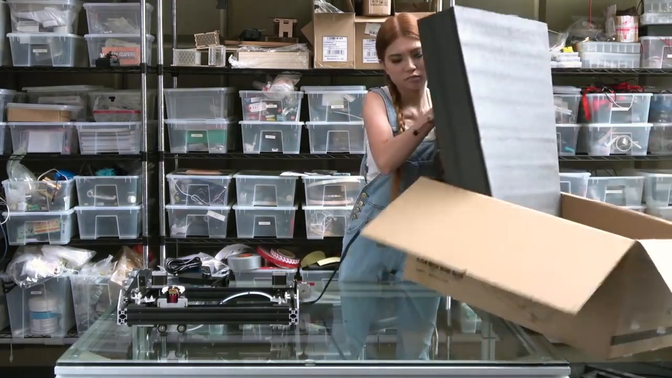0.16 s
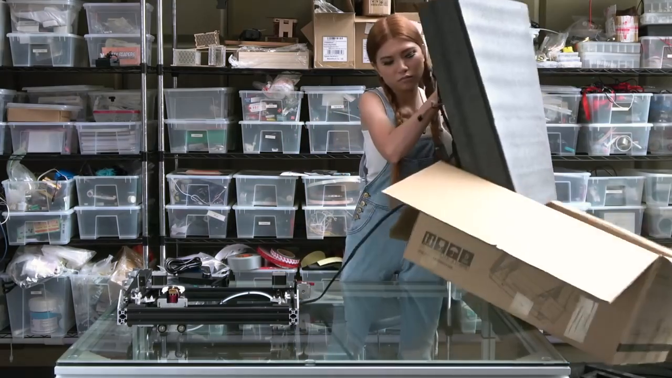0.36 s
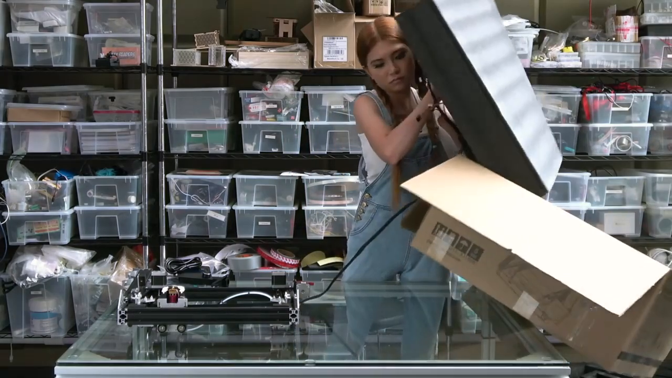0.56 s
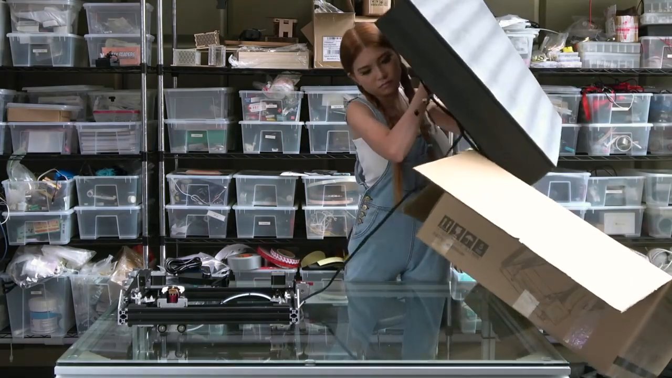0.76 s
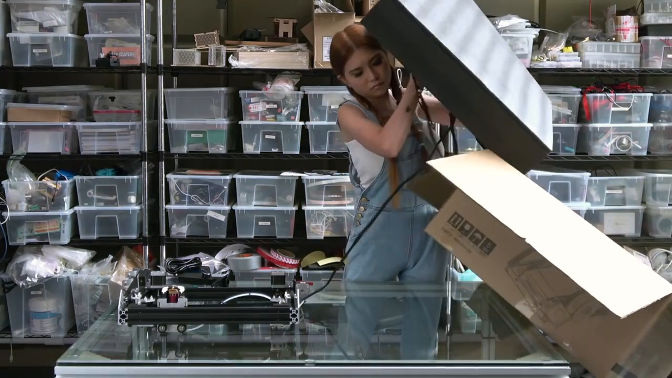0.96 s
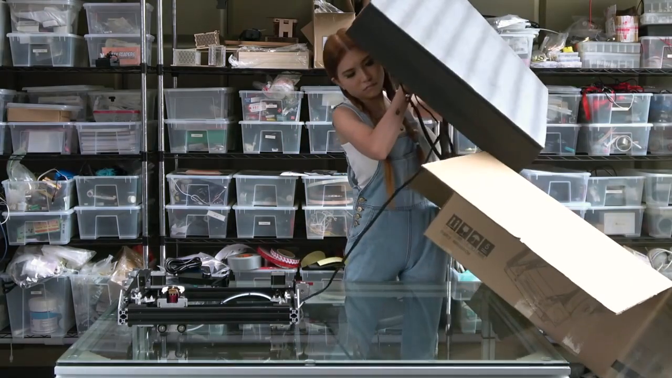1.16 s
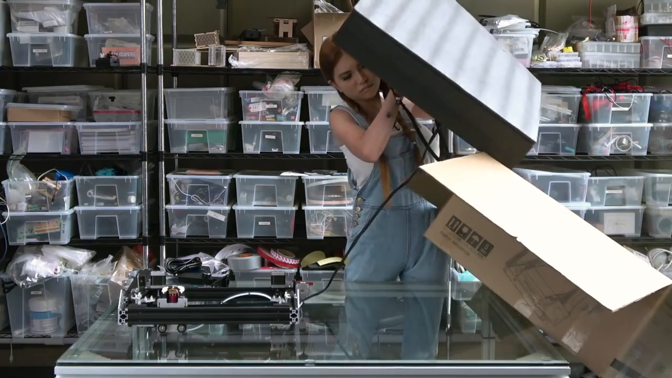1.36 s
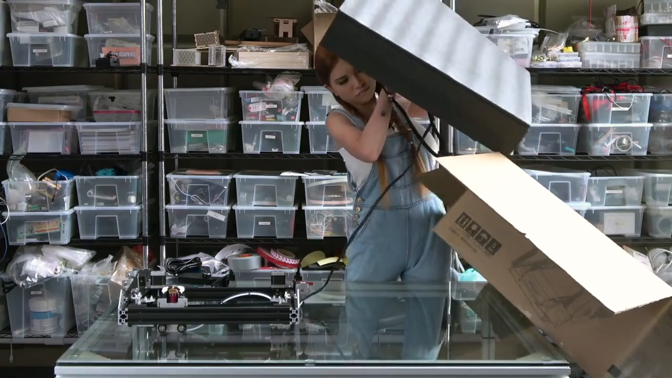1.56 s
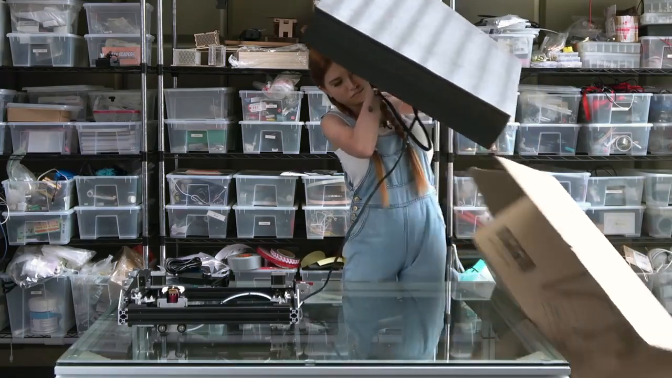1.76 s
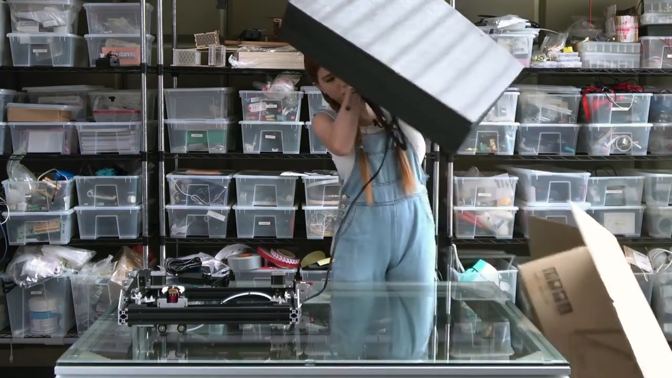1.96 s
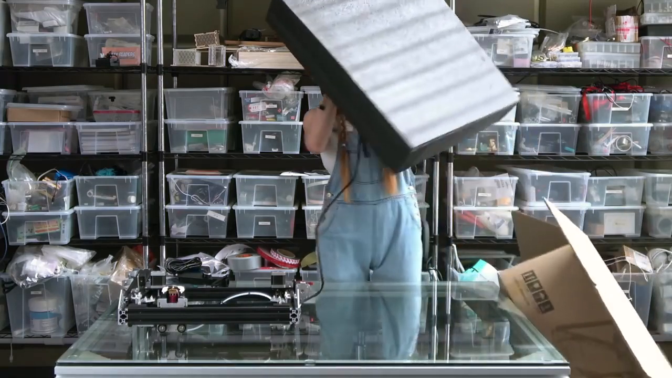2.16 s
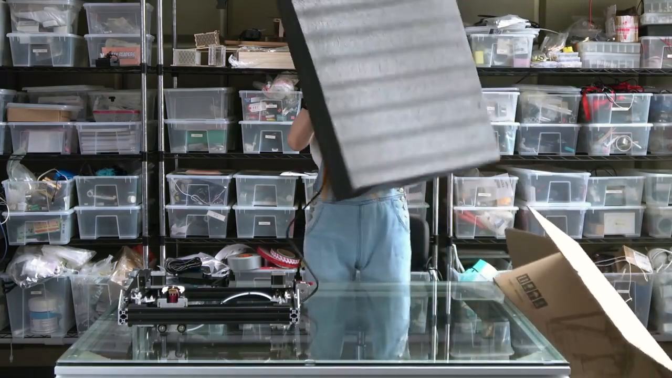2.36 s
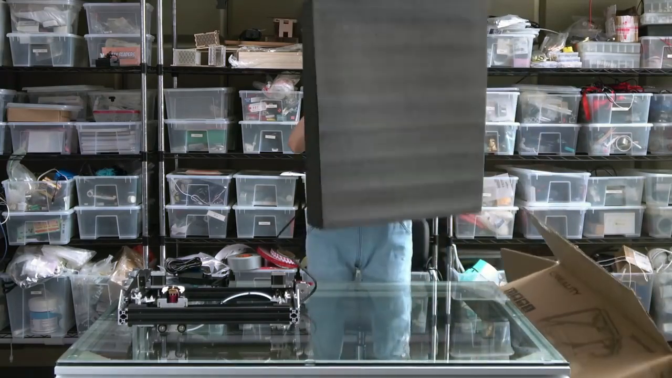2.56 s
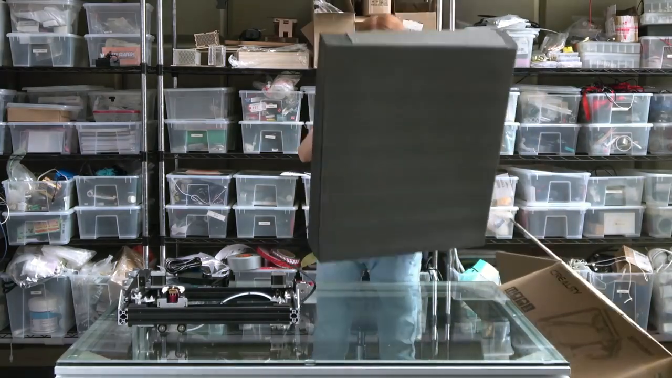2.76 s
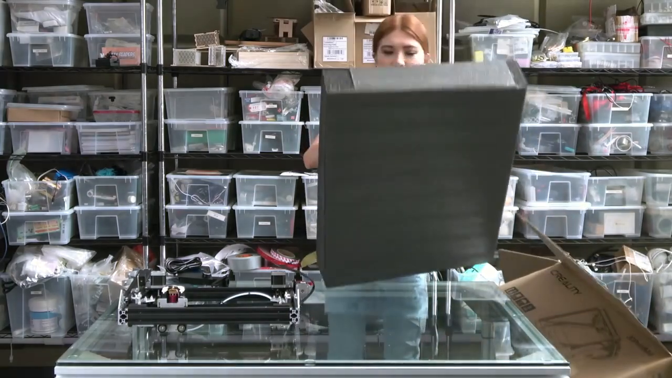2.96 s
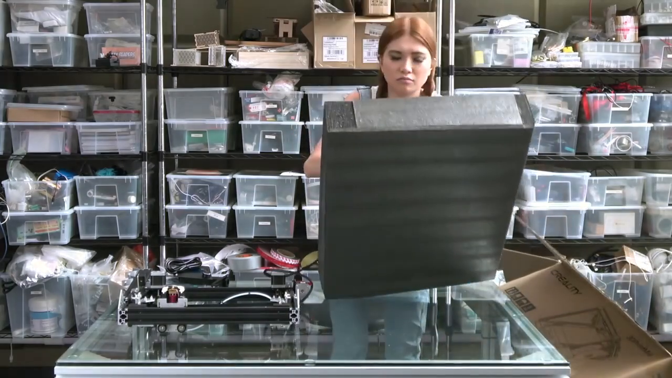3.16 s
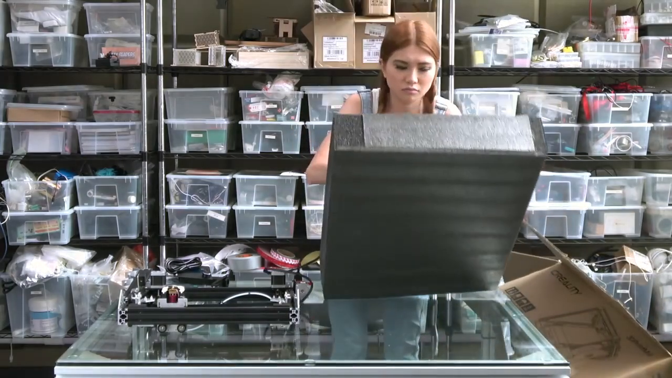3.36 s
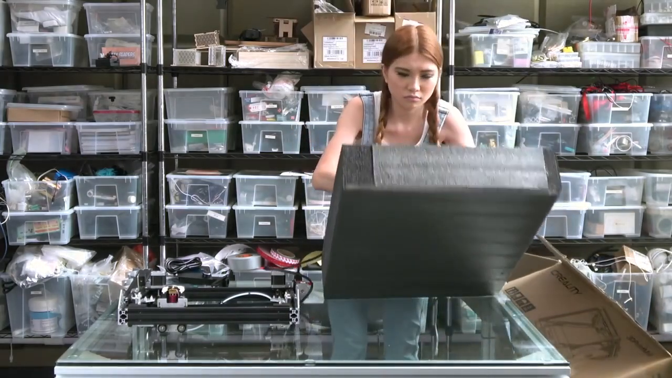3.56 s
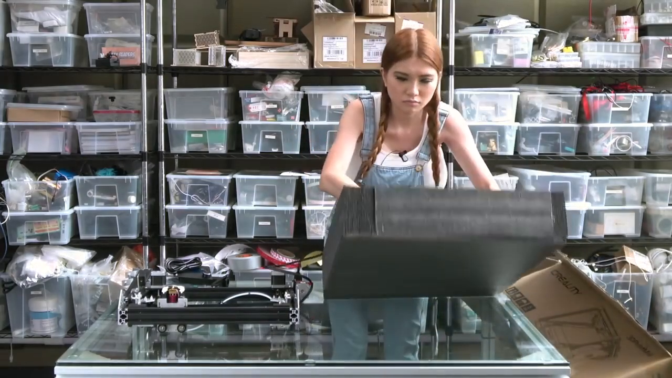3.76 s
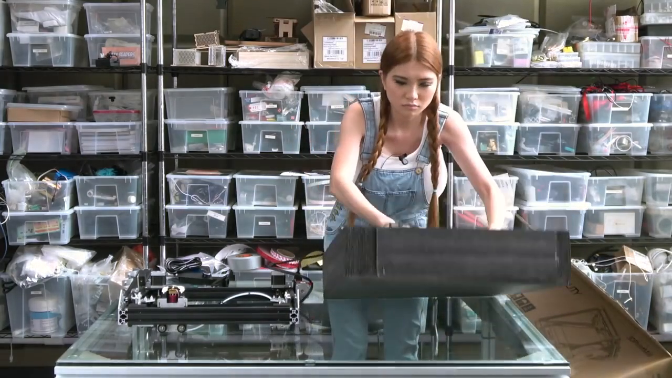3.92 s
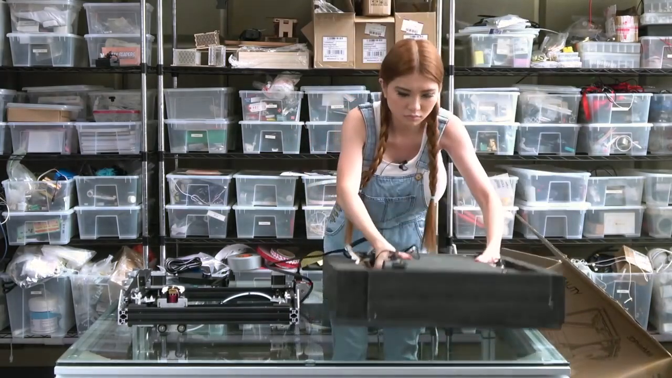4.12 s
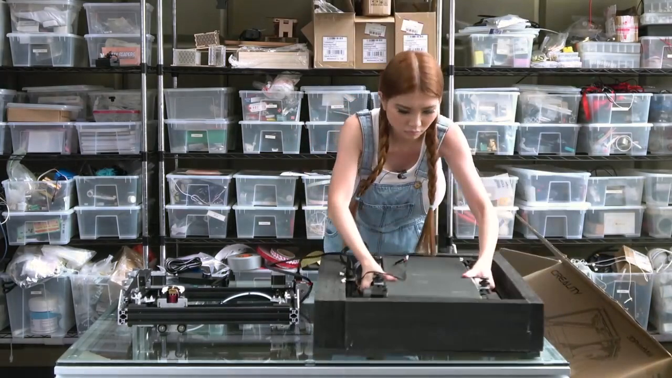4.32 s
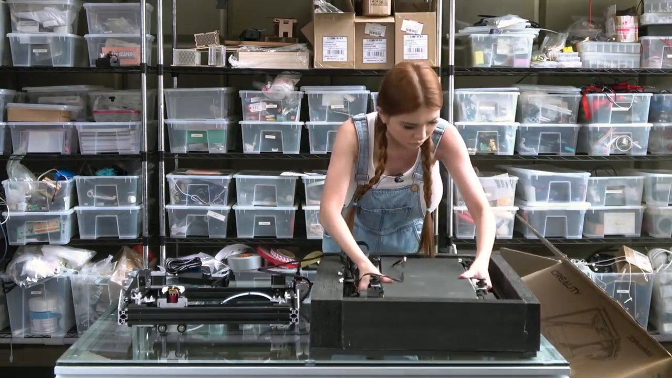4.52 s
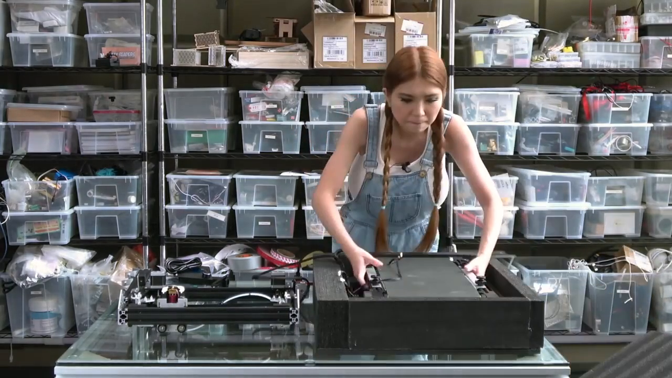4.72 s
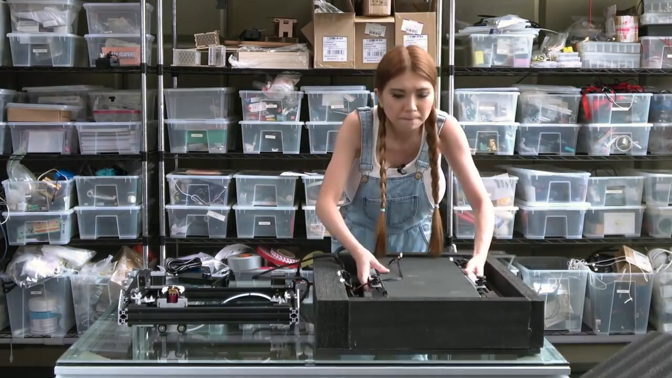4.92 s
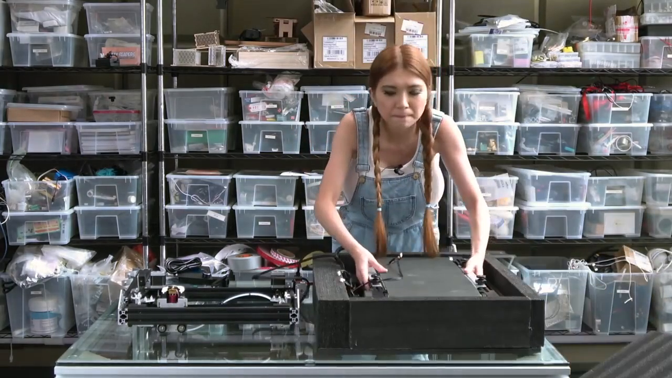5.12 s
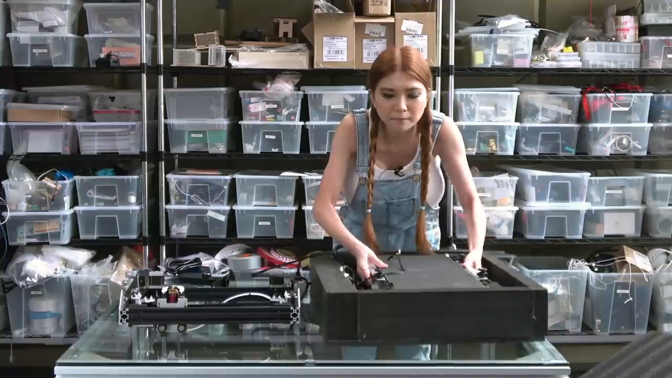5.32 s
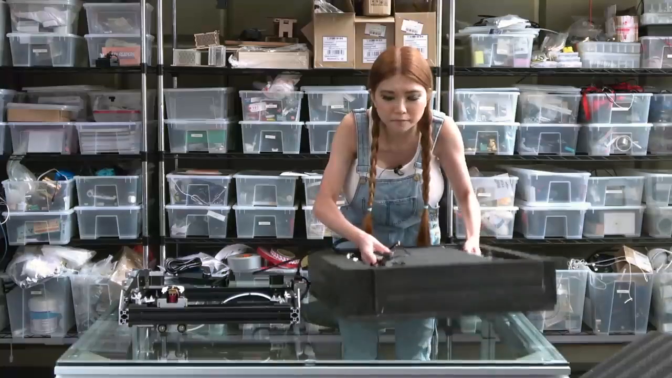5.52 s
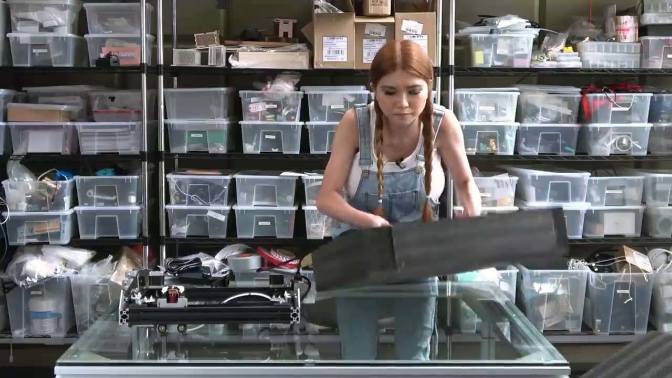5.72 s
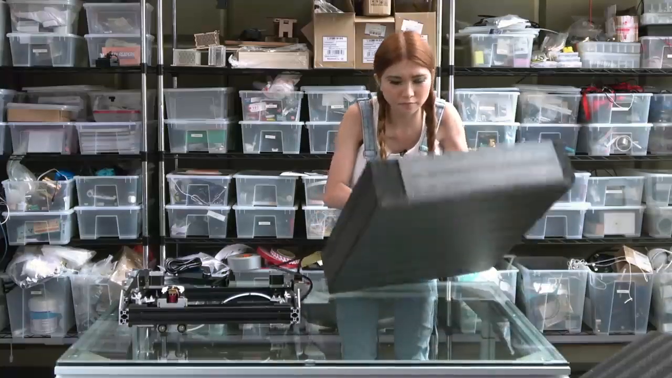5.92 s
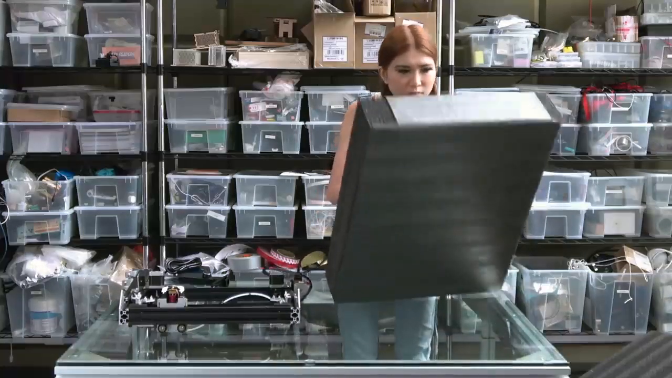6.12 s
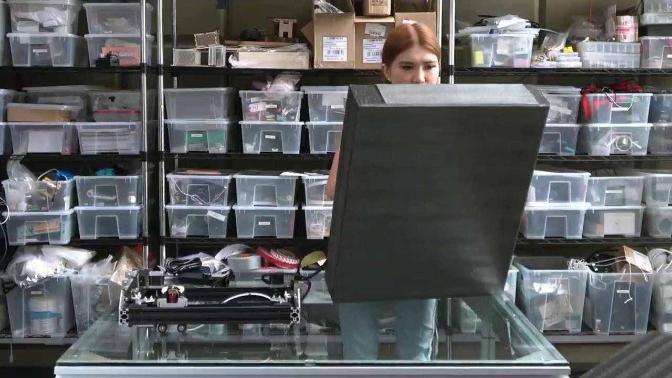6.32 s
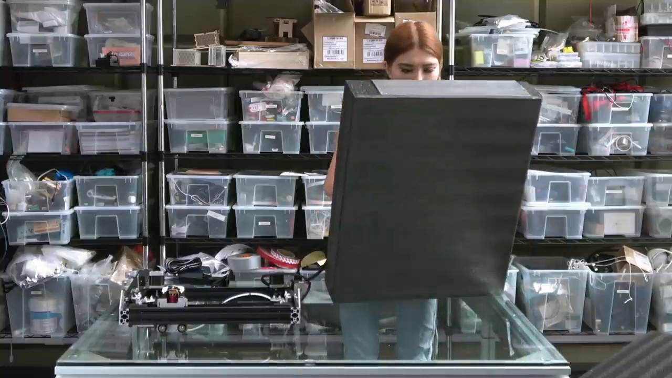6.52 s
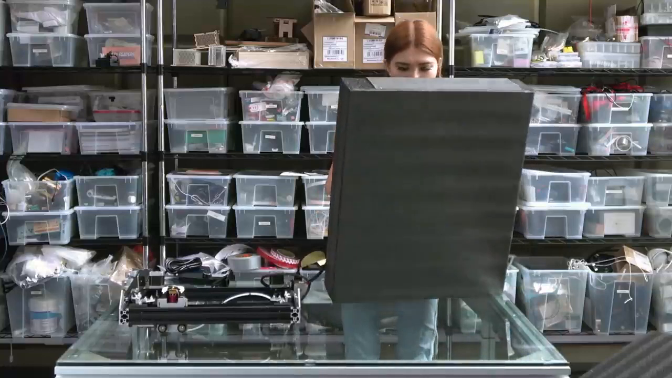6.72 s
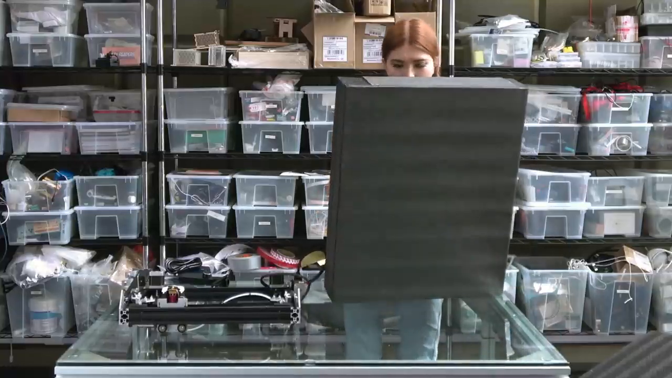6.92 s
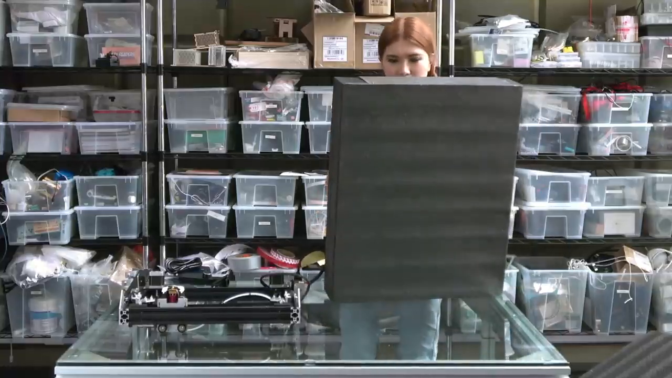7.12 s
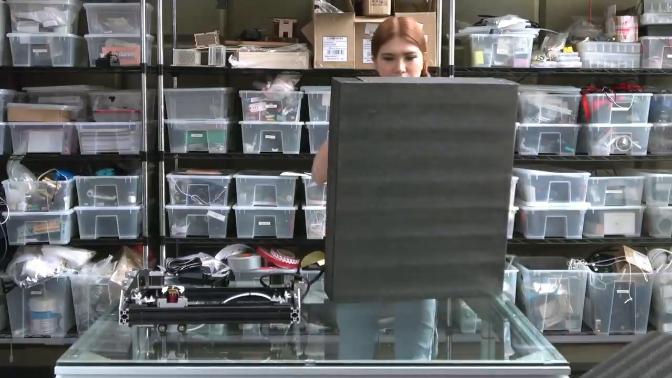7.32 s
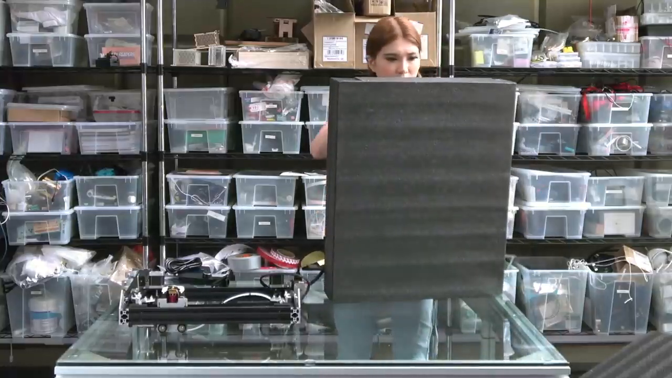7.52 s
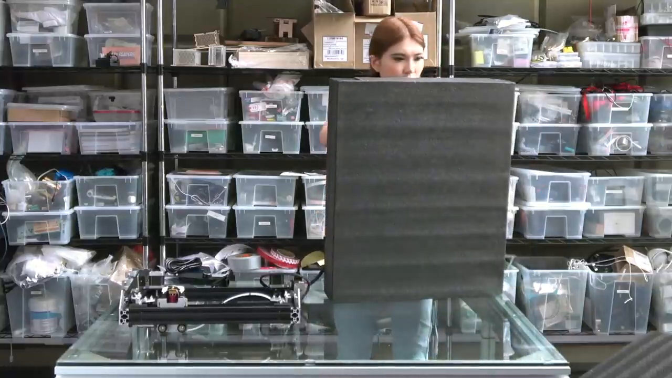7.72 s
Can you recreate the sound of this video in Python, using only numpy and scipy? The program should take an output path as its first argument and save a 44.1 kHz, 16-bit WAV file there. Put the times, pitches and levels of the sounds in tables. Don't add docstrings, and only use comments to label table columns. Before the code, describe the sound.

Cardboard thumps and rubbing as a big foam-packed block leaves its box, the empty box booms down, then foam squeaks and creaks on glass.

```python
import sys
import numpy as np
from scipy import signal
from scipy.fft import rfft, irfft
from scipy.io import wavfile
from scipy.ndimage import uniform_filter1d

SR = 44100
rng = np.random.default_rng(int(sys.argv[2]) if len(sys.argv) > 2 else 0)


def voltage_ratio(decibels):
    exponent = np.asarray(decibels, float) / 20
    return 10 ** exponent


def log_audio(samples):
    frames = np.atleast_2d(samples).T
    limited = np.clip(frames, -1, 1)
    pcm = np.round(limited * 32767).astype(np.int16)
    wavfile.write(sys.argv[1], SR, pcm)


N = 347488

# f/Hz, t60/s
ROOM_DECAY = [(100, 0.77), (300, 0.39), (800, 1), (2000, 0.66), (5000, 0.41), (12000, 0.28)]
# t/s, level/dB
NEAR_ECHOES = [(.0011, -20), (.0026, -16), (.0042, -17), (.009, -20), (.016, -22)]

# f/Hz, density/dB per Hz
PANEL_COLOUR = [(13, -45), (22, -5), (43, 0), (76, -0.5), (149, -0.5), (189, -6), (230, -10), (300, -46),
                (510, -120)]
CARD_COLOUR = [(120, -38), (195, -9), (270, -1), (440, -4), (600, -9), (860, -10), (1250, -17), (1600, -27),
               (2400, -70)]
SKIN_COLOUR = [(900, -32), (1350, -9), (1700, -4), (2100, -4), (2600, -8), (3400, -8), (5200, -13),
               (6100, -20), (7800, -46)]
FOAM_COLOUR = [(4400, -36), (6000, -8), (7000, -3), (9000, -3), (11000, -6), (14500, -10), (16200, -14),
               (17000, -60)]
# t/s, pressure/dB
HANDLING = [(0, -39), (.6, -36), (.93, -42), (1.3, -50), (1.46, -39), (2.0, -38), (2.5, -47), (3.6, -49),
            (4.4, -46), (4.8, -36), (5.14, -40), (5.6, -36), (5.99, -41), (6.37, -35), (6.62, -44),
            (6.97, -47), (7.3, -44), (7.6, -49)]
# t/s, panel level/dB, card re panel/dB, 20 dB fall/s
JOLTS = [(.043, -17, -10, .13), (.111, -15, 0, .2), (.165, -15.5, 1, .62), (2.03, -19, -2, .55),
         (2.28, -25, -7, .55), (3.246, -25, -7, .17), (3.45, -27, -11, .25), (4.034, -28, -12, .2),
         (4.418, -28, -9, .3), (6.276, -22, 0, .17), (7.621, -23, 0, .2), (7.737, -30, -9, .1)]
# peak t/s, 20 dB rise/s, 20 dB fall/s, panel level/dB
SWAYS = [
    (.888, .7, .5, -23),
    (1.013, .3, .22, -19),
    (1.202, .3, .15, -24),
    (1.7, .6, .5, -35),
    (2.75, .9, .9, -37),
    (7.877, .08, .1, -18),
]
# peak t/s, 20 dB rise/s, 20 dB fall/s, rasp level/dB, fizz re rasp/dB
BOX_RUBS = [(.1, .9, .03, -35, -1), (.16, .06, .2, -29, -20), (.649, .1, .13, -33, -15),
            (.85, .6, .15, -40, -3), (1.045, .3, .08, -35, -5), (1.202, .2, .03, -40, -4),
            (1.165, .02, .03, -56, 12), (1.336, .01, .4, -53, -3), (1.462, .2, .2, -41, -5),
            (1.752, .45, .03, -32, -4), (1.886, .2, .18, -32, -7), (2.7, .3, .35, -48, -12)]
# peak t/s, 20 dB rise/s, 20 dB fall/s, rasp level/dB, fizz re rasp/dB
BLOCK_RUBS = [(4.355, .3, .2, -45, -5), (4.769, .1, .13, -40, -5), (4.435, .02, .14, -33, -6),
              (4.92, .16, .4, -43, 1), (5.09, .5, .05, -48, 1), (5.213, .14, .6, -43, -14),
              (5.468, .3, .3, -36, -11), (5.92, .4, .08, -42, -8), (6.161, .15, .4, -46, -6),
              (6.5, .3, .12, -45, -11), (6.86, .1, .1, -52, -9), (7.074, .08, .4, -50, -12),
              (7.268, .12, .25, -49, -8), (7.443, .15, .12, -52, -3), (7.525, .06, .04, -47, -12),
              (7.625, .006, .17, -34, -4), (7.71, .15, .025, -39, -4), (7.802, .006, .3, -34, -19),
              (7.835, .006, .9, -41, -1.5)]
# start t/s, length/s, card level/dB, 20 dB fall/s
DRAGS = [
    (3.246, .12, -30, .45),
    (3.45, .215, -33.5, .7),
    (4.034, .115, -35, .28),
    (4.418, .3, -38, .25),
]

# t/s, level/dB, f/Hz, t60/s
THUMPS = [(0.039, -6.5, 48.4, 0.18), (0.107, -9.5, 232, 0.19), (0.179, -7, 120, 0.17),
          (0.219, -5.5, 115, 0.2), (0.741, -21, 133, 0.2), (0.91, -24, 155, 0.2), (0.972, -15, 48, 0.2),
          (0.982, -4, 147.7, 0.22), (1.149, -17, 86.1, 0.2), (2.02, -3, 59.2, 0.31), (2.275, -9, 64.6, 0.2),
          (2.579, -22, 72.7, 0.2), (3.241, -20, 102.5, 0.2), (6.269, -14.5, 205, 0.15),
          (7.617, -19.5, 88.5, 0.22), (7.643, -24, 102, 0.2), (7.719, -23, 45.8, 0.2),
          (7.849, -10, 51.1, 0.17)]
# t/s, level/dB
PEEPS = [
    (7.052, -41),
    (7.232, -42),
]
# f/Hz, level/dB, t60/s
BOX_MODES = [(71, 0, 1.5), (156.5, 2, 0.36), (257, -3, 0.46), (390, -22, 0.46), (520, -6.5, 0.19)]
# t/s, level/dB
DROPS = [
    (0.111, -24),
    (2.03, -14),
    (2.113, -16),
    (2.275, -23),
    (2.44, -26),
]

# t/s, tick level/dB, body knock re tick/dB, knock f/Hz
CARD_TAPS = [(.0369, -22.5, 15.5, 331), (.1074, -15, 12, 331), (.1094, -14, 0, 886), (.14, -19, 2, 1110),
             (.146, -21, 2, 1500), (.155, -19, 2, 1900), (.1615, -18, 2, 856), (.171, -17, 0, 1400),
             (.177, -17, 0, 2000), (.634, -4, -9, 1900), (.636, -9, -6, 1050), (.638, -14, 5, 880),
             (.6694, -22.5, 4.5, 804), (1.1343, -34, 11, 560), (1.2044, -28, 0, 620), (2.0234, -21, 7, 336),
             (2.7224, -31, 2, 635), (5.1905, -29, 0, 1700), (5.2285, -24, 0, 1200), (6.27, -1.5, -.5, 366),
             (6.5849, -34, -3, 544), (6.7745, -38, 11, 487), (7.056, -37, -3, 412), (7.237, -34.5, -3, 490),
             (7.7985, -27, 5, 1900), (7.8015, -26, 5, 1150), (7.8085, -32, 7, 1800), (7.811, -33, 7, 1500),
             (7.814, -32, 7, 1650), (7.8352, -26, 5, 1500), (7.84, -31, 7, 1400)]
FOAM_TAPS = [(1.4304, -31, 0, 961), (1.512, -10, -17, 301), (4.4164, 0, -8, 624), (5.2195, -30, -9, 700),
             (4.7383, -21, -1, 345), (4.779, -10, -11, 318), (5.2025, -32, 14, 480), (5.2045, -28, 6, 1200),
             (7.55, -30, -7, 503), (7.6335, -16, -2.5, 474), (7.8303, -24, 3, 1600)]
EDGE_TAPS = [(2.031, -24, 20, 400), (2.1844, -27, 1, 382), (2.2734, -26.5, 13, 503),
             (2.6895, -19.5, -6, 484), (3.241, -5, -2.5, 934), (3.3579, -13, -20, 724),
             (3.2445, -20, 12, 850), (3.4474, 0, -9, 880), (3.4505, -10, 2, 830), (3.4702, -3, -8, 821),
             (4.7635, -14, -12, 455), (4.7614, -12, -13, 455), (4.8792, -22.5, -6, 304),
             (7.2973, -29.5, -2, 339), (7.4765, -16, -7.5, 525), (7.4974, -29, -6, 428),
             (7.5313, -28, -12, 463)]
TAPE_TICKS = [(1.127, -38, -15, 500), (1.135, -35, -15, 500), (1.381, -38, -15, 500), (1.397, -42, -9, 600),
              (1.458, -32, -15, 600), (1.474, -38, -9, 600)]

# f/Hz, width/Hz, level/dB
FLAP_MODES = [(900, 70, 0), (1910, 130, -9), (3270, 100, -5), (5700, 150, -10), (9420, 300, -14),
              (12000, 470, -19)]
# t/s, level/dB
FLAP_SLIDE = [
    (1.45, -55),
    (1.6, -36),
    (1.752, -30),
    (1.765, -70),
]

# f/Hz, width/Hz, level/dB
FOAM_DULL = [(290, 110, 3), (430, 110, 4), (715, 90, 2), (830, 120, 3), (1160, 140, 2), (1450, 200, -3),
             (1760, 200, -3), (2250, 500, -9)]
# f/Hz, width/Hz, level/dB
FOAM_BRIGHT = [(3000, 200, -8), (3500, 150, -13), (4450, 200, -13), (6500, 600, -21), (4950, 150, -15),
               (7400, 500, -22), (11100, 5000, -27)]
# t/s, slip level/dB, dull share/dB, thin edge/dB
STUTTER = [(4.0297, -20, -9, -6), (4.0328, -2, -9, -6), (4.0405, -22, 0, -9), (4.0435, -26, 8, -12),
           (4.0578, -5, -7, -2), (4.0667, -14, -5, -9), (4.0725, -19, -2, -4), (4.079, -12, -5, -3),
           (4.082, -15, -4, -4), (4.0848, -12, -5, -4), (4.0875, -18, -3, -9), (4.0902, -12, -5, -8),
           (4.094, -22, 2, -1), (4.1, -10, -5, -4), (4.1035, -16, -3, -3), (4.1075, -20, -2, 3),
           (4.111, -18, -3, -6), (4.115, -18, -3, 0), (4.1215, -15, -4, -3), (4.128, -19, -4, 1),
           (4.1342, -15, -4, 0), (4.149, -10, -5, -5)]
# f/Hz, width/Hz, level/dB
STUTTER_CONTACT = [(4000, 2300, 1)]
# f/Hz, width/Hz, level/dB
STUTTER_BLOCK = [(290, 90, 14), (520, 200, 10), (930, 120, 0)]
# f/Hz, width/Hz, level/dB
THIN_EDGE = [(8250, 600, 3), (10800, 1200, -11)]
# t/s, slip level/dB, dull share/dB
CATCHES = [(3.3127, -13, -4), (3.3149, -10, -6), (3.3181, -16, -2), (3.321, -13, -4), (3.3256, -11, -3),
           (3.3294, -11, -6), (3.335, -14, -2), (3.6331, -11, -6), (4.6144, -15, -14), (4.6909, -11, -12)]
# f/Hz, width/Hz, level/dB
CATCH_CONTACT = [(4700, 2400, 1), (3300, 1500, 3)]
# t/s, slip rate f/Hz, level/dB, dull share/dB
SQUEAKS = [
    [(3.262, 1100, -36, 8), (3.276, 950, -21, 3), (3.287, 761, -17, 0), (3.3, 730, -15, -1),
     (3.3115, 715, -16, 1)],
    [(3.475, 400, -26, 6), (3.483, 420, -15, 0), (3.491, 600, -14, -3), (3.497, 720, -22, 0),
     (3.5, 810, -17, 7), (3.508, 940, -14, -3), (3.518, 1130, -15, 0), (3.525, 1150, -21, 5),
     (3.528, 1150, -30, 2)],
    [(3.531, 1150, -25, 2), (3.539, 1165, -13, 0), (3.546, 1190, -14, 1), (3.553, 1500, -12, -6),
     (3.561, 1400, -15, -3), (3.566, 1250, -20, -2), (3.57, 1140, -16, 5), (3.579, 1006, -14, -4),
     (3.586, 930, -15, -2)],
    [(3.586, 920, -15, 0), (3.591, 880, -15, 3), (3.603, 690, -17, -4), (3.609, 579, -13, -1),
     (3.616, 465, -13, -7), (3.622, 430, -15, 2), (3.63, 370, -17, 3)],
    [(4.4222, 480, -19, 0), (4.434, 948, -14, -7), (4.437, 1500, -12, -5), (4.443, 1700, -12.5, -5),
     (4.457, 1750, -14, -4), (4.467, 1560, -27, 2)],
    [(4.484, 420, -46, -10), (4.497, 380, -25, -10), (4.51, 330, -24, -14)],
    [(4.622, 200, -21, -10), (4.645, 264.5, -21.5, -9), (4.658, 276, -21.5, -7), (4.664, 228, -22, -4),
     (4.6795, 150, -21, 0)],
    [(4.47, 1700, -36, 2), (4.485, 1780, -30, 2), (4.5, 1750, -40, 0), (4.545, 1750, -38, 0),
     (4.565, 1760, -36, 2), (4.6, 1750, -42, -4)],
]
UNEVEN = [.07, .09, .06, .08, .015, .12, .015, .04]
# f/Hz, width/Hz, level/dB
CONTACT = [(4400, 3000, -5), (4000, 2200, -3), (3700, 2600, -3), (4100, 2500, -3), (3450, 1300, 2),
           (3450, 1400, 1), (3200, 2100, 1), (3500, 900, -7)]


def evened(x):
    return x / np.sqrt(np.mean(x ** 2) + 1e-20)


def smoothed(x, size):
    return uniform_filter1d(uniform_filter1d(x, size), size)


def read(points, hz):
    f, value = np.transpose(points)
    return np.interp(np.log(hz + 1), np.log(f + 1), value)


def add(mix, s, sound):
    part = mix[round(s * SR):][:len(sound)]
    part += sound[:len(part)]


def ring(hz, t60, rise):
    t = np.arange(int(SR * min(t60, 1.2)) + 64) / SR
    envelope = voltage_ratio(-60 * t / t60) * (1 - np.exp(-t / rise))
    return envelope * np.sin(2 * np.pi * hz * t)


def resonances(x, peaks):
    out = np.zeros(len(x))
    for k, (hz, width, db) in enumerate(peaks):
        mode = signal.lfilter(*signal.iirpeak(hz, hz / width, SR), x)
        out += (-1) ** k * voltage_ratio(db) * mode
    return out


def kicks(s, db):
    at = np.round((s - s[0]) * SR).astype(int)
    out = np.zeros(at[-1] + 3000)
    out[at] = voltage_ratio(db)
    return out


def shop(x):
    sparse = np.zeros(SR)
    at = np.arange(200, SR - 20, 20)
    sparse[at + rng.integers(0, 20, len(at))] = rng.choice([-1., 1.], len(at))
    hz, t, z = signal.stft(sparse, SR, nperseg=256)
    decay = voltage_ratio(-60 * t / read(ROOM_DECAY, hz)[:, None])
    tail = signal.istft(z * decay, SR, nperseg=256)[1]
    tail = voltage_ratio(-12) * tail / np.linalg.norm(tail)
    for s, db in NEAR_ECHOES:
        add(tail, s, voltage_ratio([db]))
    return signal.oaconvolve(x, tail)[:N]


def tent(t, peak, rise, fall, db, hold=0.):
    away = np.maximum((peak - t) / rise, (t - peak - hold) / fall)
    return voltage_ratio(2 * db - 40 * np.maximum(away, 0))


def motion(t):
    handling_mix, jolt_mix = np.array((-.5, .5, -14, -23)), (-12, -24)
    sway_mix, drag_mix = (-14, -28, -36), (-4, -21)
    jolt_rise_s = .007
    fall_share = np.array([1, .75, .58, .55])[:, None]

    power = voltage_ratio(2 * (np.interp(t, *np.transpose(HANDLING)) + handling_mix[:, None]))
    for s, db, card_db, fall in JOLTS:
        feed = voltage_ratio(2 * np.r_[0, card_db + np.r_[0, jolt_mix]])[:, None]
        power += feed * tent(t, s, jolt_rise_s, fall * fall_share, db)
    for row in SWAYS:
        power += np.outer(voltage_ratio(2 * np.r_[0, sway_mix]), tent(t, *row))
    for rubs, card_db in ((BOX_RUBS, 5), (BLOCK_RUBS, 2)):
        for *row, fizz_db in rubs:
            power[1:] += np.outer(voltage_ratio(2 * np.r_[card_db, 0, fizz_db]), tent(t, *row))
    for s, hold, db, fall in DRAGS:
        feed = voltage_ratio(2 * np.r_[0, drag_mix])[:, None]
        power[1:] += feed * tent(t, s, jolt_rise_s, fall * fall_share[1:], db, hold)
    return 10 * np.log10(power)


def patchy(x):
    z = signal.stft(x, nperseg=1024, axis=-1)[2]
    patches = rng.standard_normal(z.shape[:0:-1])
    patches = uniform_filter1d(patches, size=10, axis=0)
    patches = evened(uniform_filter1d(patches, size=4, axis=1)).T
    return signal.istft(z * voltage_ratio(1.8 * patches), nperseg=1024)[1][:, :x.shape[1]]


def rubbing():
    length = 360000
    t = np.arange(length) / SR
    s = np.arange(0, 8, .002)
    hz = np.fft.rfftfreq(length, 1 / SR)
    strength = voltage_ratio(3.5 * np.minimum(rng.exponential(1, length), 5))
    struck = rng.random(length) < 2500 / SR
    snags = strength * struck * rng.standard_normal(length)
    grains = np.array([evened(snags), rng.standard_normal(length)])
    snags, hiss = rfft(patchy(grains), axis=1)
    flutter = evened(smoothed(rng.standard_normal(length), 500))

    colours = (PANEL_COLOUR, CARD_COLOUR, SKIN_COLOUR, FOAM_COLOUR)
    snag_shares, flutters_db = (0.091, 0.41, 0.39, 0.49), (1.1, 1.8, 1.8, 2.2)
    out = np.zeros(length)
    for level_db, colour, snag_share, flutter_db in zip(motion(s), colours, snag_shares, flutters_db):
        spectrum = (hiss + snag_share * snags) * voltage_ratio(read(colour, hz))
        layer = evened(irfft(spectrum, length))
        out += layer * voltage_ratio(np.interp(t, s, level_db) + flutter_db * flutter - 1.1)
    return out[:N]


def thumps():
    out = np.zeros(N)
    for s, db, hz, t60 in THUMPS:
        add(out, s, voltage_ratio(db) * ring(hz, t60, 0.0028))
    for s, db in PEEPS:
        add(out, s, voltage_ratio(db) * ring(2300, .2, .008))
    for s, drop_db in DROPS:
        for hz, db, t60 in BOX_MODES:
            add(out, s, voltage_ratio(drop_db + db) * ring(hz, t60, 0.0034))
    return out


def taps():
    out = np.zeros(N)
    materials = ((CARD_TAPS, 2150), (FOAM_TAPS, 3250), (EDGE_TAPS, 3900), (TAPE_TICKS, 8800))
    rows = [(*row, tick_hz) for table, tick_hz in materials for row in table]
    lag_s, snap_db = .0011, -23
    cracks = rng.standard_normal((len(rows), 400))
    fade = np.exp(-np.arange(400) / (.0007 * SR))
    for (s, db, knock_db, knock_hz, tick_hz), crack in zip(rows, cracks):
        s = s + lag_s
        wide = signal.lfilter(*signal.iirpeak(tick_hz, 1.3, SR), crack * fade)
        wide = signal.lfilter(*signal.iirpeak(tick_hz, .6, SR), wide)
        add(out, s, voltage_ratio(db - 3) * wide / abs(wide).max())
        add(out, s, voltage_ratio(db + snap_db) * np.diff(crack * fade ** 2))
        add(out, s, voltage_ratio(db - 4) * ring(tick_hz, .006, .0001))
        add(out, s, voltage_ratio(db + knock_db + 2.5) * ring(knock_hz, .022, .0002))
        add(out, s, voltage_ratio(db + knock_db - 4.5) * ring(knock_hz * 1.468, .025, 0.00047))
    return out


def flap():
    s, db = np.transpose(FLAP_SLIDE)
    t = np.arange(s[0], s[-1], 1 / SR)
    hiss = rng.standard_normal(SR)[:len(t)]
    return s[0], voltage_ratio(np.interp(t, s, db)) * evened(resonances(hiss, FLAP_MODES))


def foam(slips, dull, contact):
    hz, width, db = contact
    edge = resonances(slips, [contact])
    for _ in range(2):
        edge = resonances(edge, [(hz, 1.4 * width, 0)])
    return voltage_ratio(9) * edge + voltage_ratio(6) * resonances(slips, FOAM_BRIGHT) + voltage_ratio(12) * resonances(dull, FOAM_DULL)


def stutter():
    s, db, dull_db, thin_db = np.transpose(STUTTER)
    slips = kicks(s, db + 14)
    body = resonances(slips, STUTTER_BLOCK)
    body = body + resonances(kicks(s, db + thin_db + 14), THIN_EDGE)
    return s[0], body + foam(slips, kicks(s, db + dull_db + 18.5), *STUTTER_CONTACT)


def catches(rows, contact):
    s, db, dull_db = np.transpose(rows)
    return s[0], foam(kicks(s, db + 14), kicks(s, db + dull_db + 14), contact)


def squeak(rows, uneven, contact):
    grip_db, grip_most = 28, .08
    s, *columns = np.transpose(rows)
    t = np.arange(s[0], s[-1], 1 / SR)
    hz, level_db, dull_db = (np.interp(t, s, c) for c in columns)
    wobble, strength, grit, grip = rng.standard_normal((SR // 4, 4))[:len(t)].T
    level_db = level_db + grip_db * min(uneven, grip_most) * evened(smoothed(grip, 150)) / 2

    speed = np.maximum(1 + uneven * evened(uniform_filter1d(wobble, 60)), .2)
    turns = np.cumsum(hz * speed) / SR + .99
    at = np.flatnonzero(np.diff(np.floor(turns), prepend=0) > 0)
    late = np.clip((turns[at] % 1) / (hz[at] / SR), 0, 1)
    kick = voltage_ratio(level_db[at] + 20 * uneven * strength[at]) * np.sqrt(SR / hz[at])
    slips = np.zeros(len(t) + 1500)
    slips[at] += late * kick
    slips[at + 1] += (1 - late) * kick
    slips[:len(t)] += 2 * uneven * voltage_ratio(level_db) * grit
    dull = slips * voltage_ratio(np.pad(dull_db, (0, 1500), "edge"))
    return s[0], foam(slips, dull, contact)


def scene():
    near = taps()
    add(near, *flap())
    add(near, *stutter())
    add(near, *catches(CATCHES[:8], CATCH_CONTACT[0]))
    add(near, *catches(CATCHES[8:], CATCH_CONTACT[1]))
    for rows, uneven, contact in zip(SQUEAKS, UNEVEN, CONTACT):
        add(near, *squeak(rows, uneven, contact))
    return (near + shop(near) + thumps() + rubbing())[None]


def top_cut(x):
    return signal.sosfilt(signal.butter(12, 16990, fs=SR, output="sos"), x)


def record(dry):
    knee = 0.97
    over = np.maximum(abs(dry) - knee, 0)
    held = np.sign(dry) * (np.minimum(abs(dry), knee) + (1 - knee) * np.tanh(over / (1 - knee)))
    held = signal.oaconvolve(held, signal.firwin(255, 16500, fs=SR)[None], "same")
    return top_cut(held)


dry = scene()
out = record(dry)
log_audio(out)
```